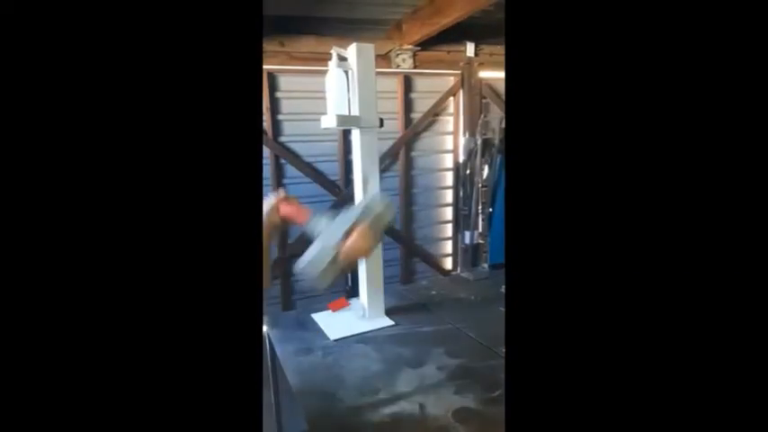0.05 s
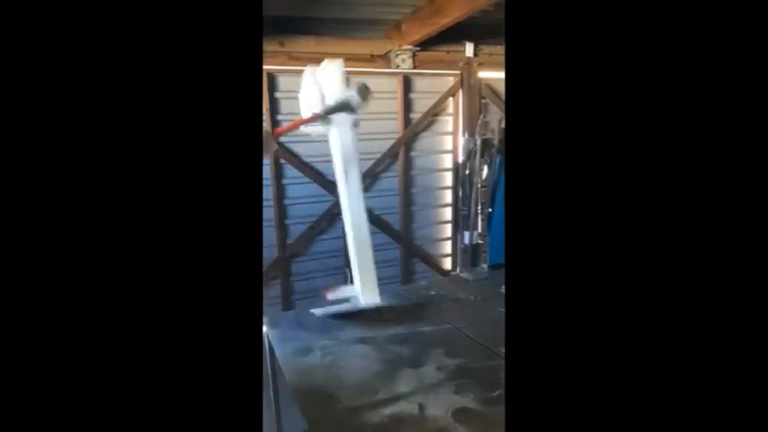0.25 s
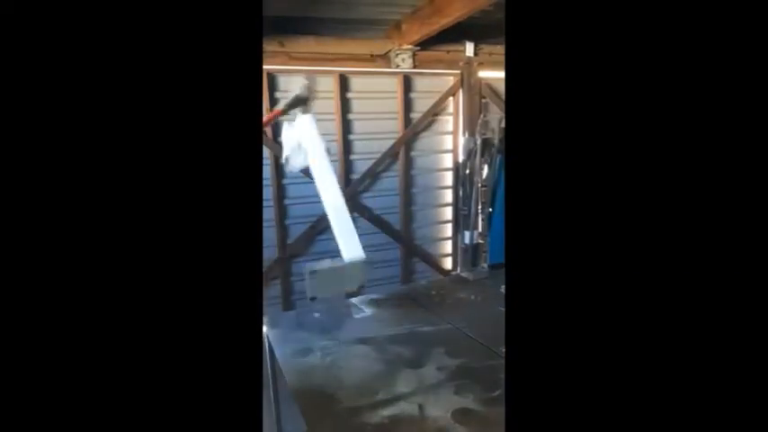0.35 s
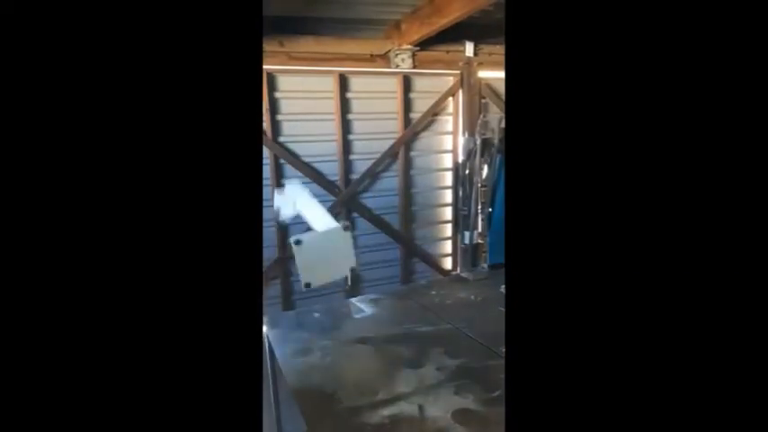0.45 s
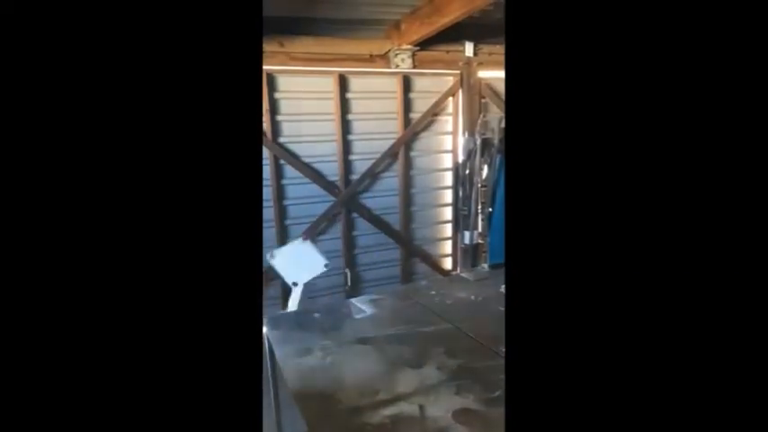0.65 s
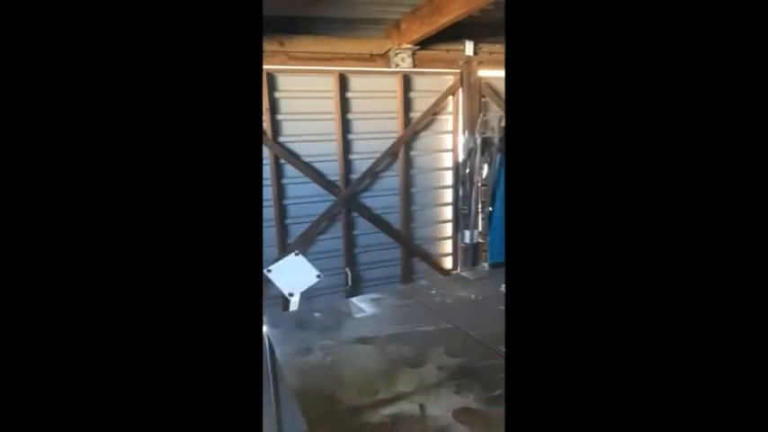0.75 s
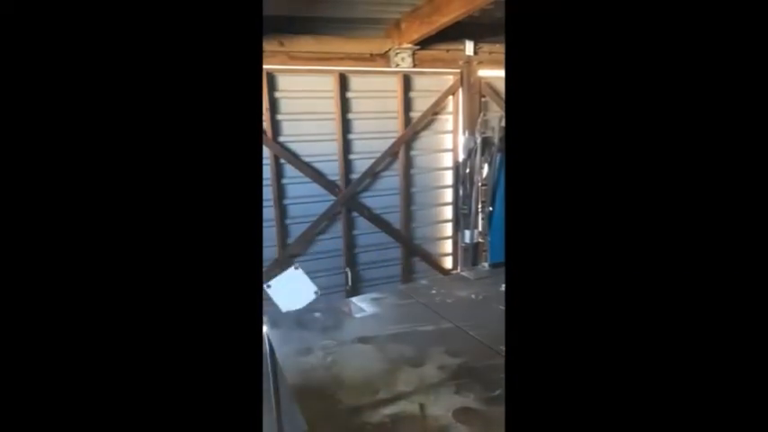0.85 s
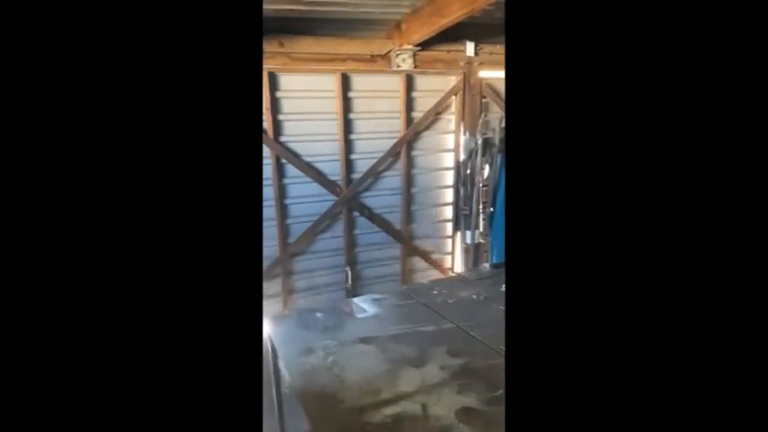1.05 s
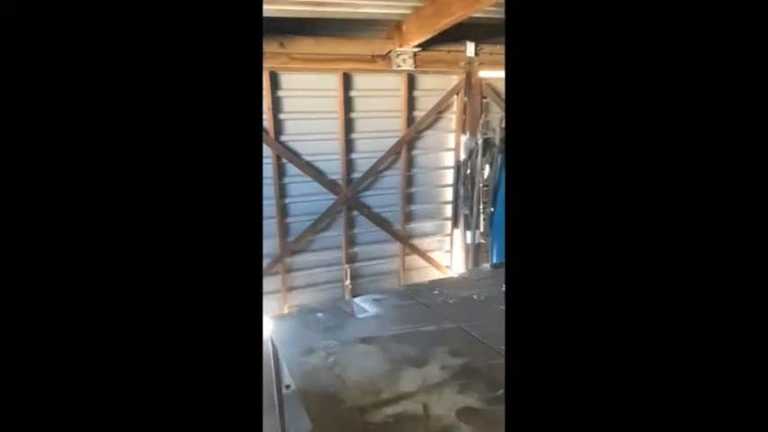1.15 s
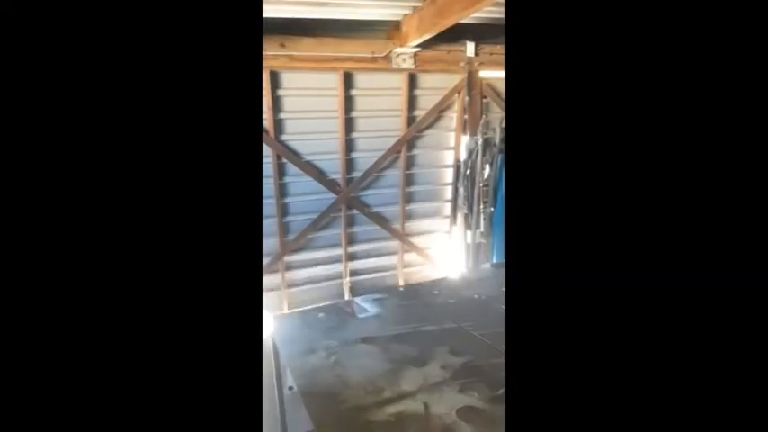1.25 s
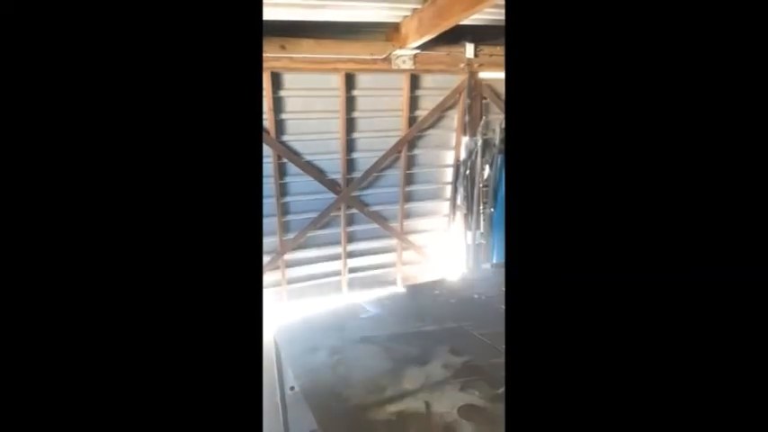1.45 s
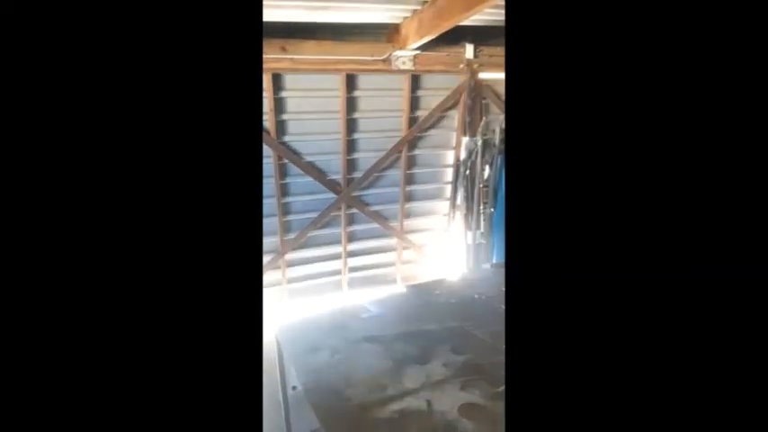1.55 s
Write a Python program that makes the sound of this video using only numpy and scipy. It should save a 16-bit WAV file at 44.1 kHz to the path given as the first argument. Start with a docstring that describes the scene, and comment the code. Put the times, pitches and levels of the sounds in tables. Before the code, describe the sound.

Hollow steel stand struck hard, crashing and clattering loudly onto a bench and floor in a tin shed

```python
"""A steel stand on a bench is struck with a heavy tool, tips over and crashes twice on the hard floor of a tin shed.
Each contact is a short rattle of noise that rings the hollow post and the base plate; the shed reverberates.
Ahead of the blow a shoe scuffs the floor, over the background of the shed; both are coloured noise on level curves.
All is far too loud for the small stereo recorder, whose limiter holds the level flat until the echo has died down."""
import sys
import numpy as np
from scipy import signal
from scipy.fft import rfft, irfft
from scipy.io import wavfile
from scipy.ndimage import uniform_filter1d

SR = 44100
rng = np.random.default_rng(int(sys.argv[2]) if len(sys.argv) > 2 else 0)


def store_pcm(level_fs):
    """Save levels as 16-bit WAV."""
    pcm = np.round(np.clip(level_fs, -1, 1) * 32767).astype(np.int16)
    wavfile.write(sys.argv[1], SR, np.atleast_2d(pcm).T)


N = 70560


def from_db(db):
    """Decibels to amplitude factor."""
    return 10 ** (np.asarray(db) / 20)


def rms_one(x):
    """Scale a sound to an overall RMS of 1."""
    return x / np.sqrt(np.mean(x ** 2) + 1e-20)


def in_time(rows):
    """Draw a curve through (time, value) points, one value per sample."""
    seconds, values = np.transpose(rows)
    return np.interp(np.arange(N) / SR, seconds, values)


def at_hz(points, hz):
    """Read a (frequency, value) curve, straight on a logarithmic pitch axis."""
    points = np.array(points)
    return np.interp(np.log(hz), np.log(points[:, 0]), points[:, 1])


# Stereo width, 1 = mono, 0 = unrelated channels: (frequency [Hz], left-right correlation [-1 to 1])
STEREO_LIKENESS = [(60, .22), (250, .4), (640, .1), (1400, -.08), (15000, .0)]


def stereo_noise(colour):
    """Spectrum of two-channel noise with the given colour and the likeness of the two microphones."""
    hz = np.maximum(np.arange(N // 2 + 1) * SR / N, 10)
    mid, side = rfft(rng.standard_normal((2, N)))
    alike = np.clip(at_hz(STEREO_LIKENESS, hz), -1, 1)
    left_right = np.sqrt(1 + alike) * mid + np.sqrt(1 - alike) * side * [[1], [-1]]
    return hz, from_db(at_hz(colour, hz)) * left_right


def hiss(colour, level):
    """Coloured stereo noise riding a level curve."""
    _, spectrum = stereo_noise(colour)
    return from_db(in_time(level)) * rms_one(irfft(spectrum, N))


# Tone of the shed's background: (frequency [Hz], relative level per Hz [dB])
AIR_COLOUR = [(18, -39), (30, -8), (435, -12.5), (859, 0), (954, -9), (1150, -6.5), (1490, -1.5),
              (3180, -7.5), (4600, -5), (15800, -27.5)]
# Fader of the background: (time [s], level [dB])
AIR_FADER = [(0, -42), (.06, -47.5), (.19, -47), (.7, -43), (1.6, -68)]


def background():
    """The air of the shed as steady noise under a slow fader."""
    return hiss(AIR_COLOUR, AIR_FADER)


# Fader of the shoe scuff: (time [s], level [dB])
SCUFF_FADER = [(0.07, -47.5), (0.076, -60), (0.092, -34.5), (0.14, -35), (0.18, -46), (0.186, -41)]
# Tone of the scuff: (frequency [Hz], relative level per Hz [dB])
SCUFF_TONE = [(180, -62), (300, -50), (1630, -34), (1740, -26), (2230, -24), (2810, -18.5), (4700, -10.5),
              (6760, -14), (9120, -26.5), (15800, -17)]


def shoe_scuff():
    """A shoe rubs the floor during the swing: friction as bright noise in quick swells."""
    return hiss(SCUFF_TONE, [(0.0054, -77)] + list(SCUFF_FADER) + [(.21, -65)])


# Every contact of the stand; the levels are relative drives:
# (time [s], rattle length [s], thud [dB], boom [dB], body [dB], crack [dB], sizzle [dB],
#  post ring [dB], plate ring [dB])
HITS = [(0.2014, 0.027, 8, 5, 12, 9.5, 15, -3.5, -13.5), (0.249, 0.021, -2, 9.5, 9.5, 4.5, 11, -26, -5.5),
        (0.291, 0.047, -8, -24, 8.5, 7, 9.5, -0.5, -24), (0.37, 0.01, -32, -24, 6.5, 8, 5, -0.5, -27),
        (0.435, 0.021, -22, -8, 2.5, -0.5, 2.5, -3, -12.5), (0.7002, 0.022, 3, 7.5, 10, 5.5, 11, -4, -0.5),
        (0.745, .03, 3, -25, 5.5, 5.5, 7, -18, -35), (0.782, 0.013, -29, -27, -1, 3.5, 1.5, -11.5, -1),
        (0.854, 0.039, -30, -24, 0.5, -3.5, -11, -9, -41), (0.907, .03, -48, -0.5, -12, -8.5, -9, -40, -24),
        (0.978, 0.066, 0, 9, -12, -15, -14, -17.5, -24), (1.004, 0.026, -19, 8, 6, -23, -15, -28, -29),
        (1.046, 0.06, -4, 0, 6, -10.5, -13, -22, -47), (1.087, 0.022, 3, 7, 10.5, -4.5, 1, -9.5, -11),
        (1.101, 0.037, -13, 3.5, 16, -0.5, 9.5, 1, -11), (1.140, 0.01, -20, -4, 11, 4.5, 3, 0.5, -12),
        (1.226, 0.033, -9, -4.5, 8.5, -13, -7.5, -3.5, -16), (1.262, .03, -16, -3.5, -7, -8, -25, -16, -22),
        (1.334, 0.099, -5, -6, -3.5, -20.5, -27, -18.5, -26.5),
        (1.385, .03, -23, -10, -27, -43.5, -51, -29, -39),
        (1.460, 0.034, -17, -8, -7.5, -64, -51, -51, -45),
        (1.574, 0.018, -13, -13.5, -16, -61, -76, -57, -41.5)]


def rattles():
    """Power of each contact over time: sudden start, dying over the rattle length, energy 1."""
    t = np.arange(N) / SR
    out = np.array([(t >= start) * np.exp(-6 * np.maximum(t - start, 0) / max(length, .002))
                    for start, length, *_ in HITS])
    return out / out.sum(axis=1, keepdims=True)


# Colour of shed and microphones: (frequency [Hz], relative level per Hz [dB])
SHED_COLOUR = [(30, -39), (60, -1.5), (150, -4.5), (400, -1), (1000, -2), (2200, 3), (6000, 1.5),
               (7200, -7.5), (8200, -20), (9300, -15), (12000, -10), (16000, -11.5)]
# Echo length of the shed: (frequency [Hz], time to fall 60 dB [s])
SHED_DECAY = [(40, 0.11), (80, 0.32), (150, 0.75), (300, 0.7), (700, 0.47), (1500, 0.52), (4000, 0.47),
              (8000, 0.52), (15000, 0.24)]
# Centres of thud, boom, body, crack and sizzle: (frequency [Hz])
REGISTERS = [70, 300, 1000, 3500, 11000]
SHED_RISE_S, DIRECT_DB, DIRECT_S = 0.0019, 0, 0.0017   # echo build-up; extra early sound and its decay


def shed_echo(power):
    """Diffuse noise in third-octave bands, each dying at its own rate: the shed's reply and the contacts' roar."""
    t = np.arange(N) / SR
    hz, echo = stereo_noise(SHED_COLOUR)
    _, noise = stereo_noise(SHED_COLOUR)
    band = np.round(3 * np.log2(hz / 20))
    early = (1 - np.exp(-t / SHED_RISE_S)) * (1 + from_db(DIRECT_DB) * np.exp(-t / DIRECT_S))
    reply, roar = 0, 0
    for k in range(31):
        centre = 20 * 2 ** (k / 3)
        decay = early * from_db(-60 * t / at_hz(SHED_DECAY, centre))
        drive_db = [np.interp(np.log(centre), np.log(REGISTERS), row) for row in np.array(HITS)[:, 2:7]]
        fed = from_db(2 * np.array(drive_db)) @ power   # doubled dB: power
        roar_power = np.maximum(signal.fftconvolve(fed, decay ** 2)[:N], 0)
        reply = reply + irfft(echo * (band == k), N) * decay
        roar = roar + irfft(noise * (band == k), N) * np.sqrt(roar_power)
    return reply, roar


def ring(clicks, hz, t60):
    """A two-pole resonator: a unit click sets a sine of height 1 ringing."""
    r, w = from_db(-60 / (t60 * SR)), 2 * np.pi * hz / SR
    return signal.lfilter([0, np.sin(w)], [1, -2 * r * np.cos(w), r * r], clicks + 1e-18)


def drift(rate):
    """Slow chance, spread 1: white noise through two equal low-pass poles."""
    r = np.exp(-2 * np.pi * rate / SR)
    return rms_one(signal.lfilter([1], [1, -2 * r, r * r], rng.standard_normal(N + 4000))[4000:])


# Modes of the hollow post: (frequency [Hz], relative level [dB], time to fall 60 dB before the cap below [s])
POST_MODES = [(695, -6.5, 0.094), (806, -5, 0.11), (1060, -11, 0.09), (964, -1.5, 0.12), (1219, -7.5, 0.52),
              (1263, 1.5, 0.41), (1284, 4.5, 0.12), (1327, -2, 0.31), (1372, 7, 0.13), (1427, -1, 0.39),
              (1544, 4.5, 0.097), (2180, -27, 0.42), (2550, -18, 0.35), (4470, 0, 0.28), (5667, -17, .15)]
# Modes of the base plate: (frequency [Hz], relative level [dB], time to fall 60 dB before the cap below [s])
PLATE_MODES = [(153.7, -6.5, 0.14), (240.5, -3.5, 0.1), (361.3, -10, 0.37), (562.7, -4, 0.77),
               (667, 9.5, 0.18), (696, -18, 0.36), (2008, 12, 0.089), (2362, -5, .25), (2780, -4.5, .25),
               (3121, -25, .25), (3830, -11, .15), (4848, -19, .12), (5720, 3, 0.14)]
RING_DB, STRIKE_SPREAD_DB, RING_DIRECT_DB = -42.5, 2.5, 0
WOBBLE_DB, WOBBLE_HZ = 4.5, 22   # the tumbling stand turns its ring to and fro
LONGEST_RING_S = .3              # cap on the decays; tighter above 1500 Hz
PATH_SPREAD_S = .002             # largest delay of a mode on its way to each microphone


def rings():
    """Post and plate modes, struck by every contact, each swelling and dipping: (sent to the shed, heard direct)."""
    table, sent, heard = np.array(HITS), np.zeros(N), np.zeros((2, N))
    starts = (table[:, 0] * SR).astype(int)
    for strike_db, modes in zip(table[:, 7:9].T, [POST_MODES, PLATE_MODES]):
        for hz, level_db, t60 in modes:
            luck = rng.standard_normal((len(table), 2))
            clicks = np.zeros(N)
            clicks[starts] = np.sign(luck[:, 0]) * from_db(strike_db + STRIKE_SPREAD_DB * luck[:, 1])
            longest = LONGEST_RING_S * min(1, np.sqrt(1500 / hz))
            swell = from_db(RING_DB + level_db + WOBBLE_DB * drift(WOBBLE_HZ))
            mode = swell * ring(clicks, hz, np.clip(t60, .02, longest))
            sent += mode / from_db(at_hz(SHED_COLOUR, hz))   # evens out the shed's colour at this pitch
            heard += [np.roll(mode, int(lag * SR)) for lag in PATH_SPREAD_S * rng.random(2)]
    return sent, from_db(RING_DIRECT_DB) * np.sqrt(SR / 20) * heard


# Dry grains by register: (contact column that drives them [index from 0], rate [per s], size spread [dB],
#  low edge [Hz], high edge [Hz], level [dB])
GRAINS = [(3, 320, 1.5, 148, 560, -6.5), (4, 560, 4, 460, 1580, -14), (5, 1500, -7, 1700, 5000, -15.5)]


def clatter(power):
    """Uneven knocks and grains of steel on concrete: random clicks, band-passed, straight to each microphone."""
    out = 0
    for column, rate, spread_db, low_hz, high_hz, level_db in GRAINS:
        sizes = from_db(spread_db * np.minimum(rng.exponential(1, (2, N)), 4))
        signed = sizes * rng.choice([-1, 1], (2, N))
        grains = rms_one(signed * (rng.random((2, N)) < rate / SR))
        drive_db = np.array(HITS)[:, int(round(column))]
        strength = np.sqrt(from_db(2 * drive_db) @ power * SR / 20)
        band = signal.butter(3, [low_hz, high_hz], "band", fs=SR, output="sos")
        out = out + from_db(level_db) * signal.sosfilt(band, grains * strength + 1e-18)
    return out


def crash():
    """The contacts roar in the shed, the rings pass through the same echo, and direct rings and clatter join."""
    power = rattles()
    reply, roar = shed_echo(power)
    sent, heard = rings()
    ringing = signal.fftconvolve(sent[None], reply, axes=1)[:, :N]
    echo_gain = np.sqrt(SR / 10 / np.sum(reply ** 2))   # sets the energy of the echo
    return (roar + ringing) * echo_gain + heard + clatter(power)


def scene():
    """The falling stand in the shed, the scuff and the background."""
    return from_db(-17) * crash() + shoe_scuff() + background()


LIMIT_DB, RELEASE_DB_PER_S = -10.0, 175
LIMIT_ATTACK_S, LEVEL_WINDOW_S = 0.00067, 0.0041
CUTOFF_HZ, TOP = 16050, 1.0   # low-pass stop-band edge; full scale


def record(dry):
    """A limiter ducks fast and recovers at a steady rate; the highest peaks are flattened, the top is cut."""
    t = np.arange(N) / SR
    mean_power = uniform_filter1d(np.mean(dry ** 2, axis=0), int(LEVEL_WINDOW_S * SR))
    level = 10 * np.log10(np.maximum(mean_power, 1e-12))
    # the held level jumps up with the sound and falls no faster than the release
    held_level = np.maximum.accumulate(level + RELEASE_DB_PER_S * t) - RELEASE_DB_PER_S * t
    over = np.maximum(held_level - LIMIT_DB, 0)
    r = np.exp(-1 / (LIMIT_ATTACK_S * SR))
    limited = dry * from_db(-signal.lfilter([1 - r], [1, -r], over))
    low_pass = signal.cheby2(14, 45, CUTOFF_HZ, fs=SR, output="sos")
    return np.clip(signal.sosfilt(low_pass, np.clip(limited, -TOP, TOP)), -TOP, TOP)


dry = scene()
out = record(dry)
store_pcm(out)
```